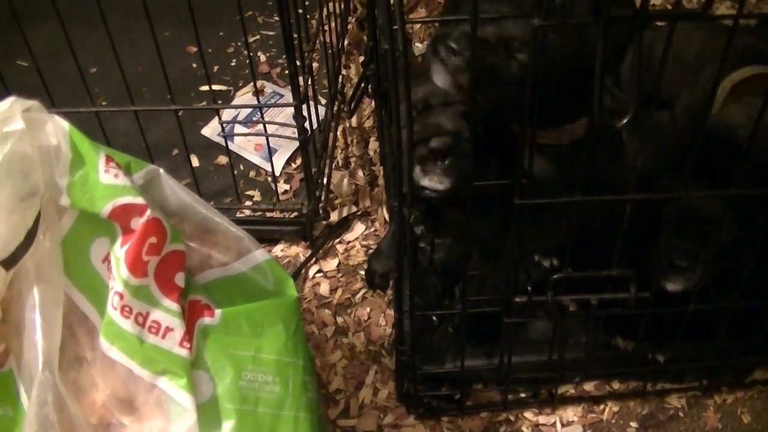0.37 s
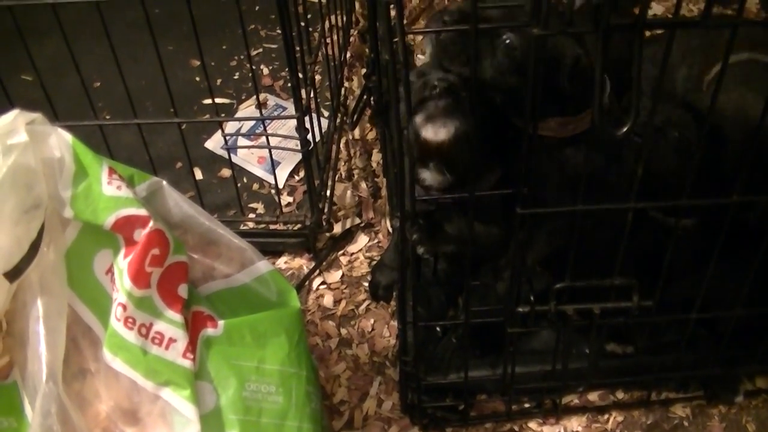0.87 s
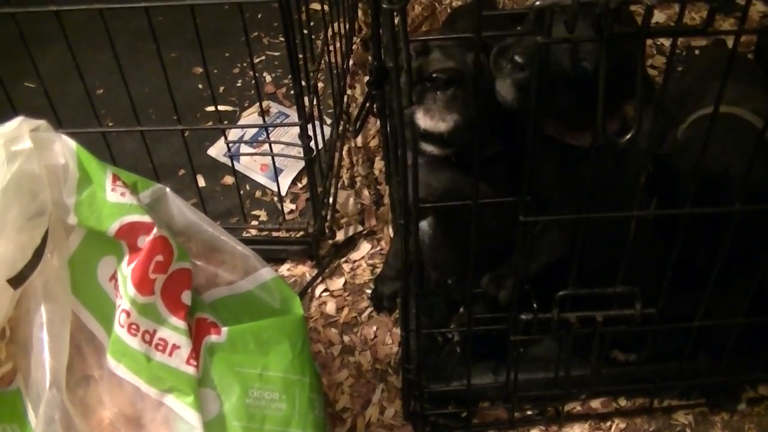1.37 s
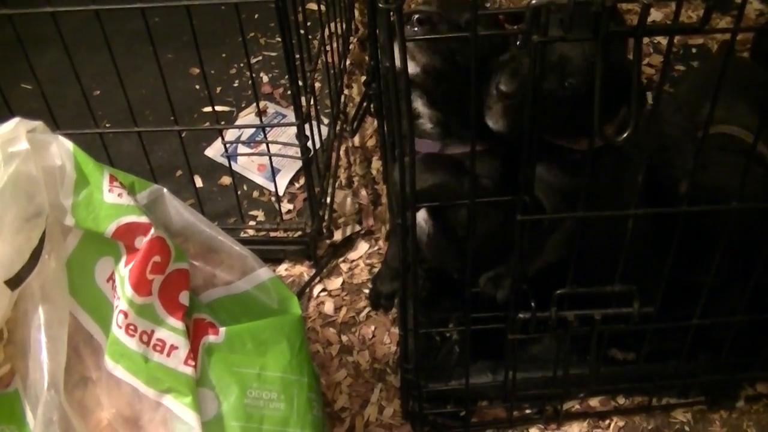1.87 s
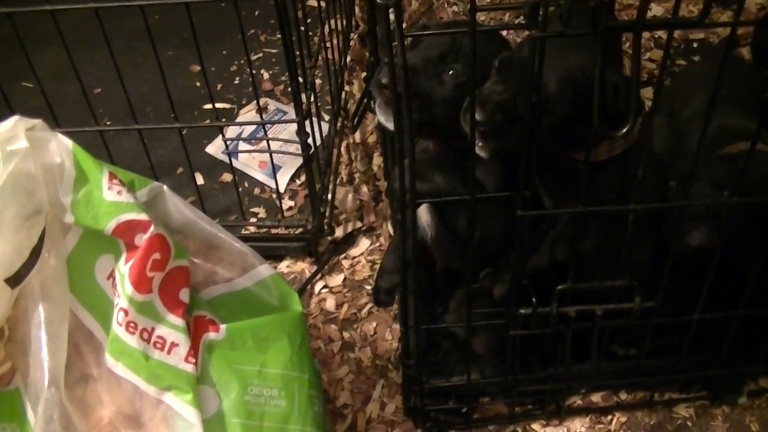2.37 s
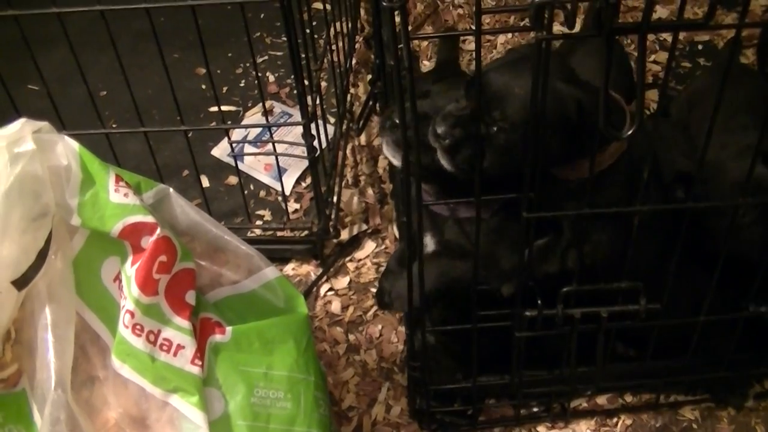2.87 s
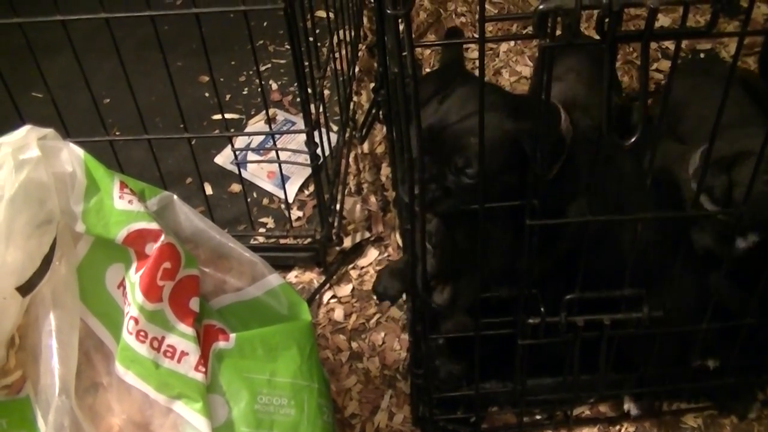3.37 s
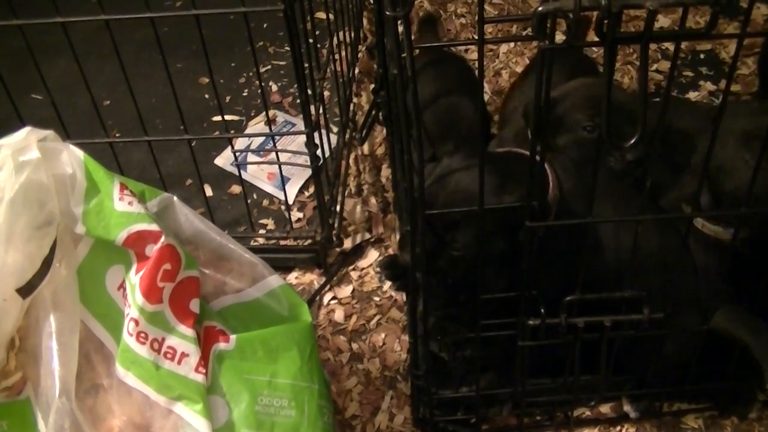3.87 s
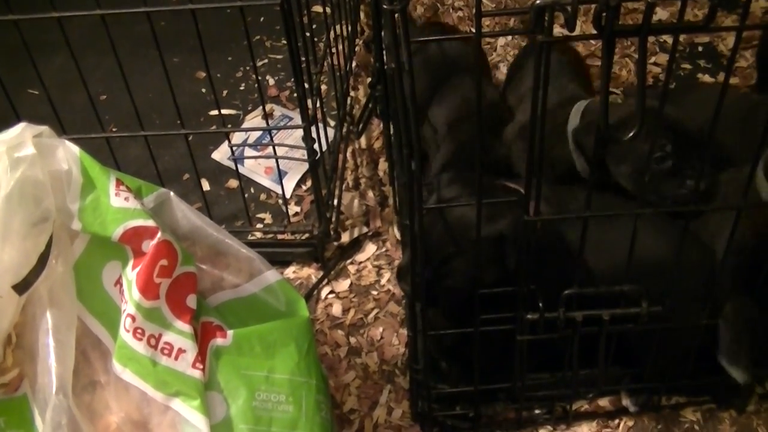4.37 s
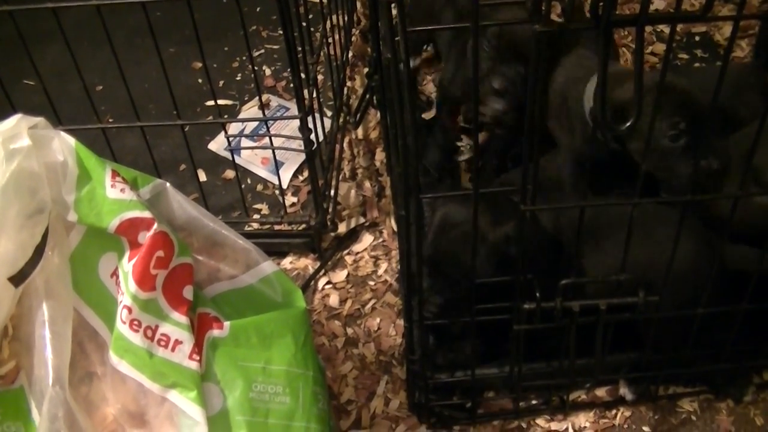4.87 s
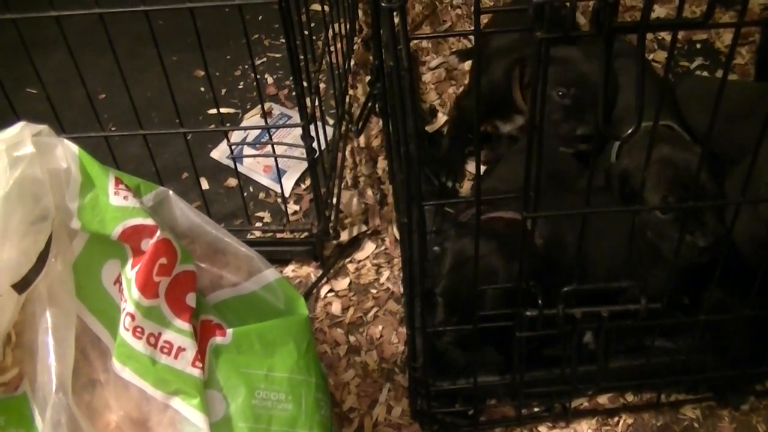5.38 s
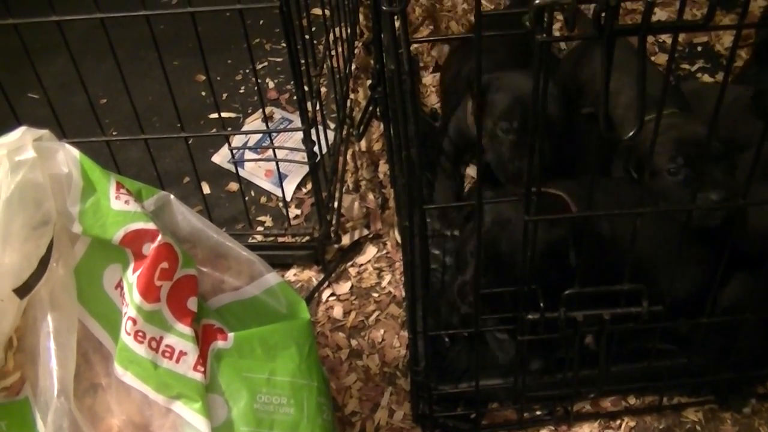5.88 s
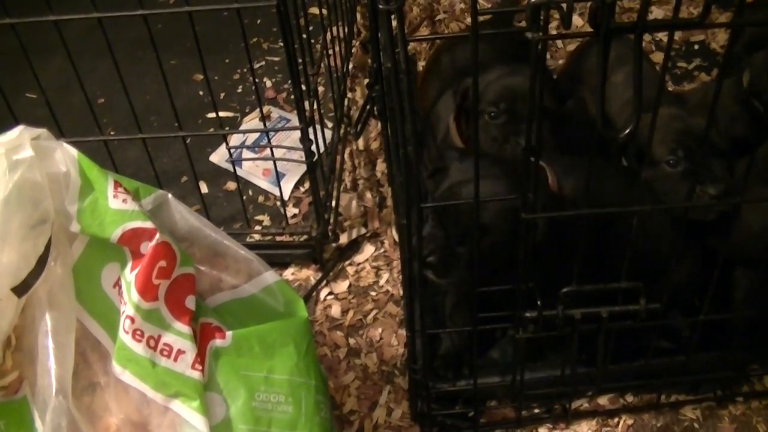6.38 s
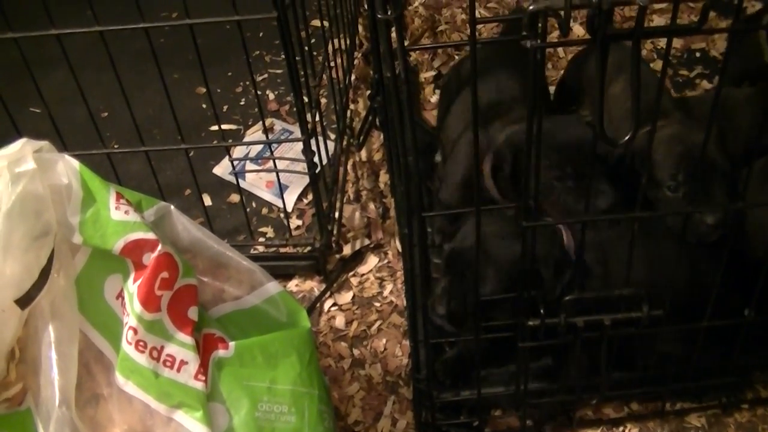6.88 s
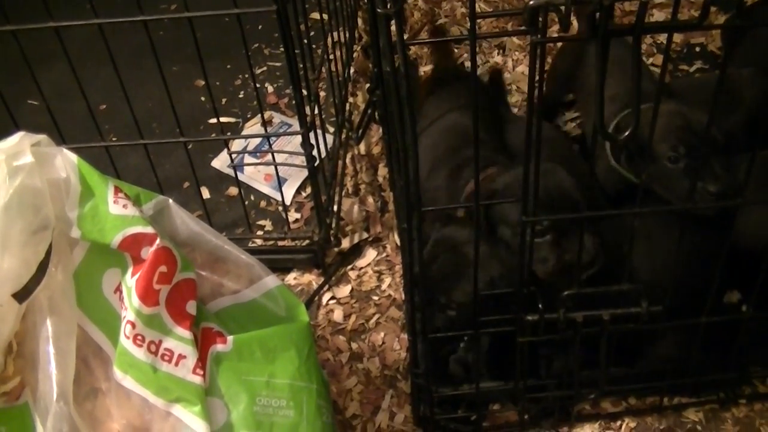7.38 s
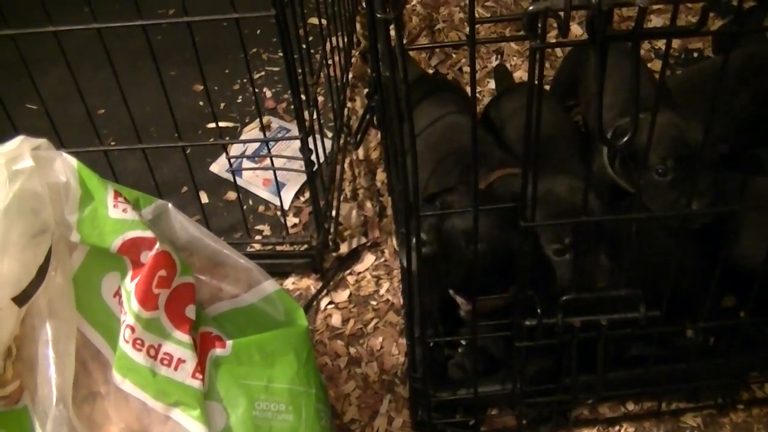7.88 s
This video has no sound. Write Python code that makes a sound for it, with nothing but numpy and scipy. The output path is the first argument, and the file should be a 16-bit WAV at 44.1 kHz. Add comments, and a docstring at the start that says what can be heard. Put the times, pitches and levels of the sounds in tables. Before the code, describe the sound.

A close, nearly centred chorus of puppy distress: short piercing yelps a few times a second, longer plaintive cries in the middle, then denser, rougher screaming towards the end. Muffled whines from other pups fill the gaps. A few light wire ticks, short indoor reverberation and a very faint airy murmur, picked up by a small bass-shy camera microphone.

```python
"""A pup's clear cry, ended by a thin whistle, opens on a litter crying in a wire crate in a small, hard room.
Close to the camera, pups yelp, cry and scream: bright overtones of gliding pitch, roughened where hoarse.
Softer pups whine behind them on arched pitches, duller overtones of the same kind of voice.
The whistles are short rising tones, and paws on the wire are clicks of fading treble hiss.
A decaying noise tail blurs the pauses over a faint murmur of air and bedding."""
import sys
import numpy as np
from scipy import signal
from scipy.fft import rfft, irfft
from scipy.io import wavfile
from scipy.ndimage import uniform_filter1d

SR = 44100
rng = np.random.default_rng(int(sys.argv[2]) if len(sys.argv) > 2 else 0)


def digitize_waveform(pressure):
    """Quantize a signal to 16-bit integers and store it at the path in sys.argv[1].

    Rows of a 2-D input are taken as channels; values are limited to [-1, 1].
    """
    field = np.atleast_2d(pressure).T
    bounded = np.clip(field, -1, 1)
    quanta = np.round(bounded * 32767).astype(np.int16)
    wavfile.write(sys.argv[1], SR, quanta)


def volts_from_db(level):
    """Convert decibel levels to linear amplitude ratios."""
    exponent = np.asarray(level, float) / 20
    return 10 ** exponent


N = 352800

# Throat and mouth of a pup. Each row: frequency in Hz, level in dB.
THROAT = [(350, -24.5), (750, -2), (1650, -4), (2300, -1), (2950, -11), (3650, -2.5), (5200, -10.5),
          (8500, -21.5), (10500, -34), (15500, -55)]
SWELL_DB = 7  # a near call opens up by this much on its way to the top
FADE_DB_PER_S = 4.5  # yelps and cries tire
DROP_S, DROP = .02, .2255  # the pitch drops by this share as the breath ends


def unit(x):
    """Scaled to rms 1."""
    return x / np.sqrt(np.mean(x ** 2) + 1e-20)


def along(points, hz):
    """Values of (Hz, value) points, read on a log frequency axis."""
    f, v = np.transpose(points)
    return np.interp(np.log(hz + 1), np.log(f + 1), v)


def above(hz, knee_hz):
    """0 up to the knee, rising to 1 half an octave above it."""
    return np.clip(np.log2(hz / knee_hz) * 2, 0, 1)


def ramp(t, start, end):
    """0 before start, 1 after end, straight between."""
    return np.clip((t - start) / max(end - start, 1e-3), 0, 1)


def span(start, end):
    """Sample times in seconds from start to end, cut at the end of the scene."""
    return np.arange(round(start * SR), min(round(end * SR), N)) / SR


def wobble(n, rate, count=1):
    """Rows of slow chance: n samples, straight lines between rate random knots a second."""
    at = np.arange(n) * rate / SR
    knots = rng.standard_normal((count, int(n * rate / SR) + 2))
    left = at.astype(int)
    return knots[:, left] + (knots[:, left + 1] - knots[:, left]) * (at - left)


def coloured(spectrum):
    """Noise of rms 1 with the given spectrum in (Hz, dB)."""
    gain = volts_from_db(along(spectrum, np.fft.rfftfreq(N, 1 / SR)))
    return unit(irfft(rfft(rng.standard_normal(N)) * gain, N))


def fades(n, rise, fall):
    """A straight fade in and out, in seconds."""
    t = np.arange(n) / SR
    return np.clip(np.minimum(t / rise, t[::-1] / fall), 0, 1)


def glide(t, start, top):
    """Share of the top pitch on the way up: the climb slows near the top."""
    return 1 - (1 - .74) * (1 - ramp(t, start, top)) ** 1.5


def clear_note(t, top, end, top_hz, settled_hz, last_hz):
    """Pitch after the top: it sinks to the note, drifts, and drops at the very end."""
    settle_s = .075
    sinks = np.sin(np.pi / 2 * ramp(t, top, top + settle_s)) ** 2
    drifts = ramp(t, top + settle_s, end - DROP_S)
    hz = top_hz + (settled_hz - top_hz) * sinks + (last_hz - settled_hz) * drifts
    return hz * (1 - DROP * ramp(t, end - DROP_S, end))


def breaths():
    """Breath noise through the throat, split into its body and its treble."""
    whole = coloured(THROAT)
    body = signal.sosfiltfilt(signal.butter(2, 4200, fs=SR, output="sos"), whole)
    return np.array([body, whole - body])


def voice(hz, hoarse, breath, dull_db, thin_db, top_db, knee_hz, count):
    """Overtones of the vocal folds read through the throat; hoarse folds flutter, skip beats and leak breath."""
    n = len(hz)
    roughness = .02 * hoarse + .08 * hoarse ** 2
    hz = hz * (1 + .007 * wobble(n, 30)[0] + roughness * wobble(n, 300)[0])
    cycles = np.cumsum(hz) / SR
    k = np.arange(1, count + 1)[:, None] / 2  # overtones, with lines halfway between
    line_hz = k * hz

    # a turned or half-shut mouth loses most between the knee and 5 kHz; the whistling top still leaks out
    colour_db = along(THROAT, line_hz) - thin_db * (k <= 1)
    colour_db -= dull_db * above(line_hz, knee_hz) * (1 - 0.51 * above(line_hz, 4300))
    colour_db -= top_db * above(line_hz, 5600)
    colour_db += 4.5 * wobble(n, 20, count=len(k))  # the jaw moves, so each overtone swells on its own
    colour_db += 5 * hoarse * wobble(n, 300, count=len(k))  # flutter

    skipped_beats = np.where(k % 1, 1.3 * hoarse ** 2, 1)  # these sound the halfway lines
    gain = volts_from_db(colour_db) * (line_hz < SR / 2.5) * skipped_beats
    strength = np.sqrt(uniform_filter1d((gain ** 2).sum(0), size=600) / 2)
    tone = (gain * np.cos(2 * np.pi * k * cycles + k * k)).sum(0) / strength
    torn = .15 * hoarse ** 2  # share of the tone's strength left to chance
    tone = tone * (np.sqrt(1 - torn) + np.sqrt(torn) * unit(wobble(n, 400)[0]))

    puffs = 1 + .5 * np.cos(2 * np.pi * cycles)  # once a cycle
    rasp = (breath[0] + volts_from_db(-dull_db / 2 - top_db) * breath[1]) * puffs
    rasp_share = .005 + .25 * hoarse ** 2
    mixed = np.sqrt(1 - rasp_share) * tone + np.sqrt(rasp_share) * rasp
    return mixed * volts_from_db(1.5 * wobble(n, 45)[0])  # the breath comes unevenly


def add_near_call(out, breath, t, top, hz, db, hoarseness, closes):
    """Sounds one near call over the times t: the mouth opens towards the top and may shut on the final drop."""
    # How the near pups turn and gape. Each row: time in seconds, treble lost in dB, fundamental lost in dB.
    facing = [(1.1, 16, -0.5), (1.3, 5, 6), (3.8, 8.5, 5), (4.3, 18.5, -5), (5.3, 1, 8.5), (8, 14.5, 6.5)]
    at = np.round(t * SR).astype(int)
    hoarse = uniform_filter1d(np.where(t < top, *hoarseness), size=900)
    crack_s = .018
    hoarse = hoarse + .3 * closes * np.exp(-((t - top - crack_s / 2) / crack_s) ** 2)  # cracks at the top

    facing_s, treble_db, fundamental_db = np.transpose(facing)
    dull_db = np.maximum(np.interp(t[0], facing_s, treble_db), 0)
    dull_db = dull_db + SWELL_DB * (1 - ramp(t, t[0], top))
    dull_db = dull_db + closes * 20 * ramp(t, t[-1] - DROP_S, t[-1])  # the mouth shuts
    thin_db = np.interp(t[0], facing_s, fundamental_db)
    top_db = 10 * (t[0] > 5.6)  # later the heads turn aside and the highest overtones fade

    rise_s, fall_s = (.01, .01) if closes else (.03, .03)
    sound = voice(uniform_filter1d(hz, size=150), hoarse, breath[:, at], dull_db=dull_db, thin_db=thin_db,
                  top_db=top_db, knee_hz=1993, count=28)
    out[at] += volts_from_db(db) * fades(len(at), rise_s, fall_s) * sound


def cries(out, breath):
    """Clear cries: the folds tighten in one glide up to the note, which then sinks and tires."""
    # Each row: start, top and end in seconds, top, settled and last pitch in Hz (before the final drop),
    # level in dB at the top.
    cry_calls = [(0, 0.054, .085, 944, 915, 900, -25), (2.229, 2.302, 2.35, 985, 986, 975, -23),
                 (3.239, 3.287, 3.49, 1102, 1026, 1041, -22.5),
                 (4.079, 4.124, 4.468, 1048, 1008, 959, -26.5),
                 (5.289, 5.318, 5.505, 1100, 1075, 1178, -22.5),
                 (5.538, 5.578, 5.69, 1094, 1042, 1034, -21.5), (5.667, 5.71, 5.855, 1279, 1255, 1189, -19),
                 (6.012, 6.046, 6.23, 1279, 1232, 1173, -22.5),
                 (6.388, 6.436, 6.56, 1200, 1204, 1211, -20.5),
                 (7.189, 7.273, 7.455, 1141, 1118, 1073, -24.5), (7.661, 7.69, 7.87, 1068, 1040, 1099, -23),
                 (7.809, 7.861, 7.965, 1110, 1060, 981, -23)]
    for start, top, end, *note_hz, db in cry_calls:
        t = span(start, end)
        hz = glide(t, start, top) * clear_note(t, top, end, *note_hz)
        level_db = db - SWELL_DB * (1 - ramp(t, start, top)) - FADE_DB_PER_S * np.maximum(t - top, 0)
        add_near_call(out, breath, t, top, hz, level_db, (.22, .21), closes=True)


def whistles():
    """Air squeezed through a narrow gap as the mouth closes: a short, slightly rising tone."""
    # Each entry: start in seconds.
    whistle_starts = [.081, 1.361, 1.766, 2.596, 3.069]
    out, t = np.zeros(N), np.arange(round(0.014 * SR)) / SR
    for start, spread in zip(whistle_starts, rng.standard_normal((len(whistle_starts), 1))):
        hz = 11900 * (1 + 0.016 * spread + t)
        tone = np.sin(2 * np.pi * np.cumsum(hz) / SR)
        envelope = fades(len(t), 0.0014, 0.031)  # the fall outlasts the tone, so it peaks below half
        out[round(start * SR):][:len(t)] += volts_from_db(-26 - 2 * spread) * envelope * tone
    return out


def yelps(out, breath):
    """Yelps start low in the chest voice and flip up into the head voice, which settles on its note."""
    # Each row: start, break and end in seconds, top, settled and last pitch in Hz (before the final drop),
    # level in dB at the start.
    yelp_calls = [(0.182, 0.216, .395, 1297, 1122, 1082, -24),
                  (0.605, 0.679, .712, 1160, 1100, 1080, -24.5),
                  (0.914, 0.969, 1.03, 1244, 1060, 1120, -27), (1.229, 1.265, 1.37, 1290, 1172, 1220, -23),
                  (1.546, 1.585, 1.77, 1225, 922.4, 976, -21),
                  (1.938, 1.996, 2.187, 1224, 1126, 1104, -21.5),
                  (2.343, 2.391, 2.597, 1297, 1167, 1155, -21.5),
                  (2.76, 2.798, 3.072, 1275, 1092, 1109, -21.5), (4.67, 4.72, 4.88, 855, 752, 733, -27.5)]
    break_s = .007
    for start, flip, end, *note_hz, db in yelp_calls:
        t = span(start, end)
        top = flip + break_s
        chest = note_hz[0] * (.55 + (.68 - .55) * ramp(t, start, flip))
        head = clear_note(t, top, end, *note_hz)
        hz = chest + (head - chest) * ramp(t, flip - break_s / 2, flip + break_s / 2)
        sob = 1 + .044 * np.exp(-((t - 2.995) / .036) ** 2)  # one yelp's pitch lifts for a moment
        add_near_call(out, breath, t, top, hz * sob, db - FADE_DB_PER_S * (t - start), (.28, .17), closes=True)


def screams(out, breath):
    """Hoarse screams: overdriven folds flutter, roughest on the climb, then tire with the mouth left open."""
    # Each row: start and end in seconds, top and last pitch in Hz (before the final drop), level in dB
    # at the top, fade to the end in dB.
    scream_calls = [(.19, 0.31, 1290, 1255, -21, 13), (3.421, 3.59, 1295, 1172, -21, 13.5),
                    (3.614, 3.94, 1305, 1110, -21.5, 4), (5.899, 6.07, 1108, 1039, -20, 5),
                    (6.188, 6.36, 1247, 888, -20.5, 6), (6.5, 6.71, 1191, 1052, -21, 9),
                    (6.782, 7.1, 1259, 1139, -17.5, 19.5), (7.15, 7.27, 1075, 1022, -18.5, 7.5),
                    (7.504, 7.68, 1112, 1068, -18, 25)]
    # Each entry: hoarseness of one scream after its top, from 0 clear to 1 torn.
    scream_hoarse = [.7, .5, .38, .85, .75, .75, .47, .8, .45]
    for (start, end, top_hz, last_hz, db, fade_db), torn in zip(scream_calls, scream_hoarse):
        t = span(start, end)
        top = start + .045
        tires = ramp(t, top, end)
        hz = glide(t, start, top) * (top_hz + (last_hz - top_hz) * tires)
        hz = hz * (1 - DROP * ramp(t, end - 2 * DROP_S, end))
        level_db = db - SWELL_DB * (1 - ramp(t, start, top)) - fade_db * tires
        add_near_call(out, breath, t, top, hz, level_db, (min(torn + .13, 1), torn), closes=False)


def near_pups():
    """The pups by the microphone share one breath noise; their small mouths radiate no bass."""
    out, breath = np.zeros(N), breaths()
    cries(out, breath)
    yelps(out, breath)
    screams(out, breath)
    return signal.sosfilt(signal.butter(4, 520, "high", fs=SR, output="sos"), out)


def whines():
    """Pups further back, mouths nearly shut: duller voices on arched pitches; the faintest come at random."""
    # Each row: start and end in seconds, start, middle and end pitch in Hz, level in dB.
    whine_calls = [(.45, .59, 788, 1087, 930, -37), (0.52, 0.59, 528, 654, 697, -32.5),
                   (0.76, 0.89, 794, 1040, 1037, -37), (1.05, 1.15, 696, 680, 810, -38),
                   (1.385, 1.495, 620, 866, 803, -26), (1.4, 1.52, 910, 1130, 890, -37),
                   (2.53, 2.62, 466, 537, 572, -30.5), (2.61, 2.76, 1286, 1189, 1127, -30),
                   (2.62, 2.72, 650, 652, 639, -31), (2.865, 3.06, 599, 685, 457, -30.5),
                   (3.07, 3.23, 1016, 1040, 1152, -30.5), (3.225, 3.3, 421, 474, 595, -35),
                   (3.29, 3.45, 1101, 1210, 1100, -29), (3.73, 3.92, 721, 769, 740, -30),
                   (3.99, 4.08, 1020, 867, 760, -33.5), (4.47, 4.58, 644, 755, 850, -35.5),
                   (4.84, 4.98, 523, 549.5, 526, -35.5), (5.0, 5.115, 754, 956, 756, -26),
                   (5.095, 5.22, 760, 743, 729, -31.5), (5.21, 5.32, 592, 671, 777, -29.5),
                   (5.35, 5.5, 600, 759, 712, -31.5), (6.88, 6.98, 957, 876, 836, -28),
                   (7.05, 7.125, 658, 632, 580, -39.5), (7.31, 7.45, 600, 721, 758, -32.5),
                   (7.505, 7.67, 823, 902, 787, -28)]
    out, breath = np.zeros(N), breaths()
    faint = []
    for a, b, c, d in rng.random((60, 4)):
        start = 7.8 * a
        faint.append((start, start + .05 + .08 * b, 450 + 400 * c, 550 + 500 * c, 450 + 600 * d, -49 + 11 * b))
    for start, end, first_hz, middle_hz, last_hz, db in [*whine_calls, *faint]:
        at = np.arange(round(start * SR), round(end * SR))
        arch = np.polyfit([-1, 0, 1], [first_hz, middle_hz, last_hz], 2)
        hz = np.polyval(arch, np.linspace(-1, 1, len(at)))
        sound = voice(hz, .18, breath[:, at], dull_db=23, thin_db=2, top_db=0, knee_hz=1950, count=22)
        out[at] += volts_from_db(db) * fades(len(at), .015, .015) * sound
    return out


def wire():
    """A claw ticks the bars, which hiss briefly in the treble: a sharp blow and a weaker ring."""
    # Each entry: time of a tick in seconds.
    tick_times = [2.241, 4.345, 4.427, 4.588, 4.7, 5.118]
    blows, t = np.zeros(N), np.arange(SR // 10) / SR
    blows[np.round(np.multiply(tick_times, SR)).astype(int)] = volts_from_db(-36)
    decay = volts_from_db(-60 * t / 0.004) + 0.45 * volts_from_db(-60 * t / 0.25)  # t60 of 4 ms and 250 ms
    return signal.fftconvolve(blows, decay)[:N] * coloured([(2000, -6), (11000, 0)])


def room(x):
    """Each frequency of the room's answer dies at its own speed, a little different at each ear."""
    # Each row: frequency in Hz, time to fall by 60 dB in seconds.
    decay_times = [(800, .3), (12000, .18)]
    hz, t, z = signal.stft(rng.standard_normal((2, SR // 2)), SR, nperseg=256)
    dying = volts_from_db(-60 * t / along(decay_times, hz)[:, None])
    middle, side = signal.istft(z * dying, SR, nperseg=256)[1]
    tail = middle + 0.17 * np.array([side, -side])
    delayed = np.pad(x, (200, 0))[None]  # samples before the first answer
    return signal.fftconvolve(delayed, tail / np.linalg.norm(tail[0]), axes=1)[:, :N]


def murmur():
    """The faint air of the room and rustle of bedding: coloured noise that swells slowly by chance."""
    # Each row: frequency in Hz, relative density in dB per Hz.
    air = [(300, 8.5), (900, 4), (2500, -6.5), (8700, -4.5), (15500, -13)]
    swell = volts_from_db(-53 + 3 * wobble(N, 6))
    side = 0.2 * coloured(air)
    return swell * (coloured(air) + np.array([side, -side]))


def scene():
    """Near sounds almost centred, far pups slightly left, one room answering both, and the murmur."""
    near, far = near_pups() + whistles() + wire(), whines()
    dry = near * volts_from_db([[.2], [-.2]]) + far * volts_from_db([[.7], [-.7]])  # left and right, in dB
    return dry + volts_from_db(-5.5) * room(near + far) + murmur()


def low_pass(x):
    """Removes everything above the highest recorded frequency."""
    return signal.sosfilt(signal.butter(12, 15710, fs=SR, output="sos"), x)


def record(dry):
    """The camera's small microphone passes neither the bass nor the extreme treble."""
    microphone = signal.butter(3, [420, 15500], "band", fs=SR, output="sos")
    return low_pass(signal.sosfilt(microphone, dry))


dry = scene()
out = record(dry)
digitize_waveform(out)
```